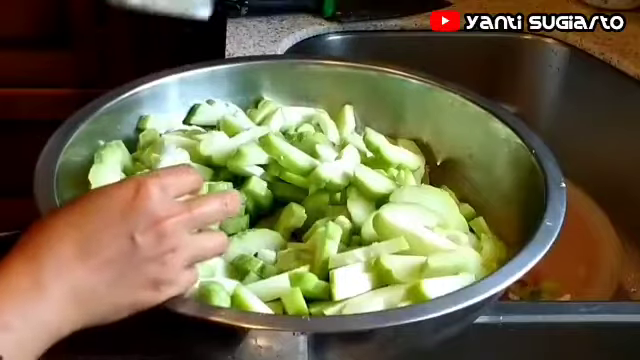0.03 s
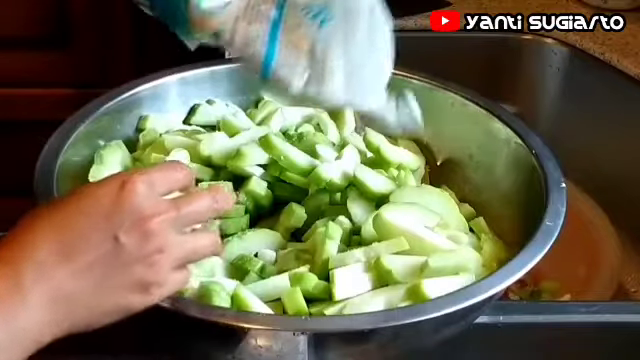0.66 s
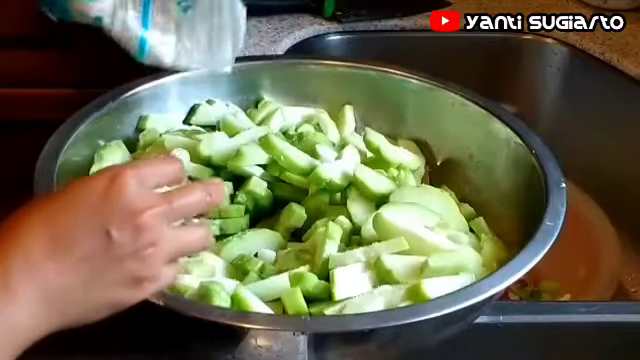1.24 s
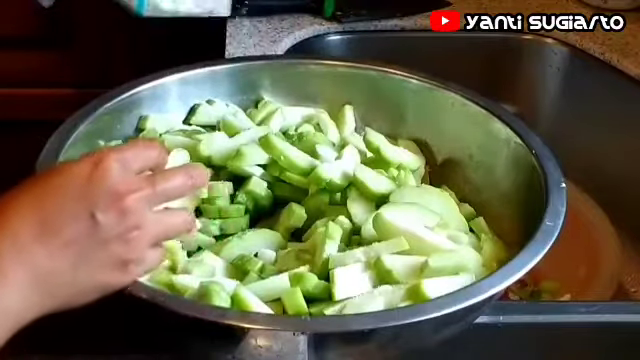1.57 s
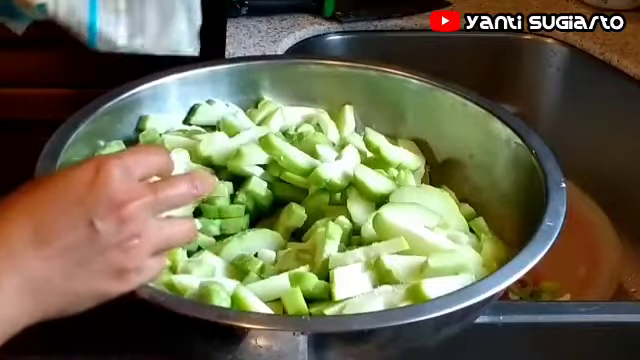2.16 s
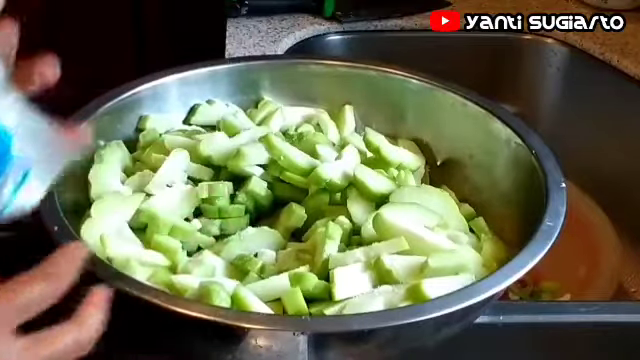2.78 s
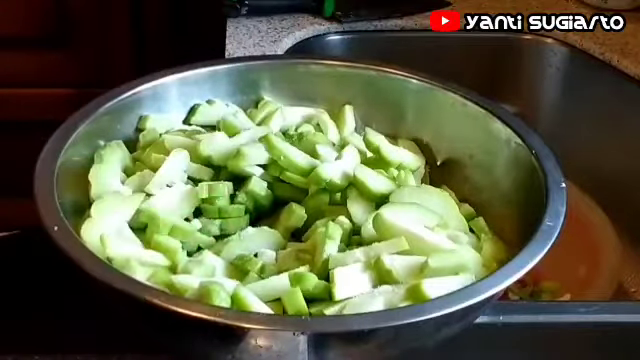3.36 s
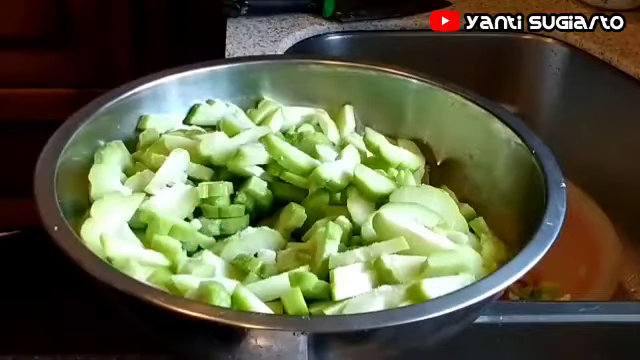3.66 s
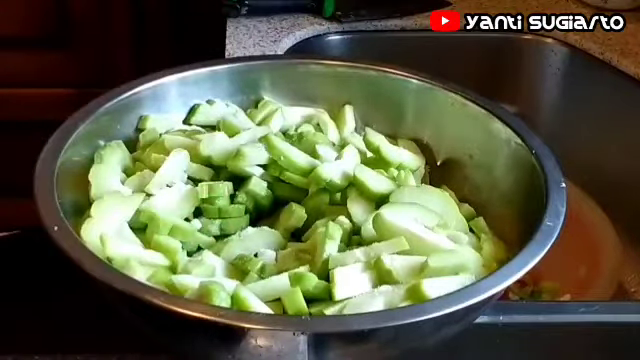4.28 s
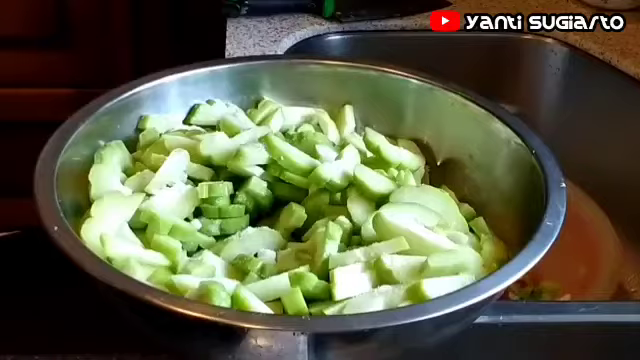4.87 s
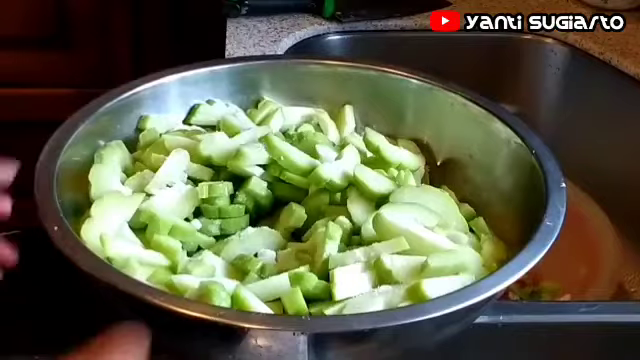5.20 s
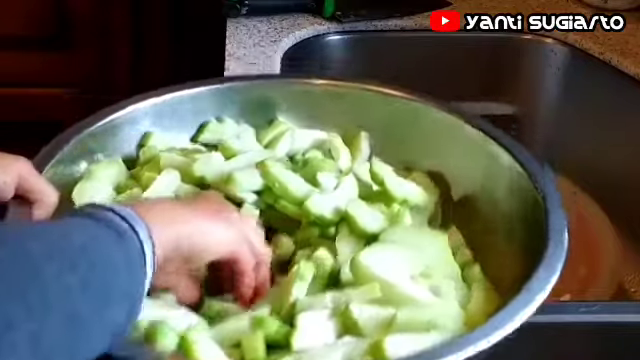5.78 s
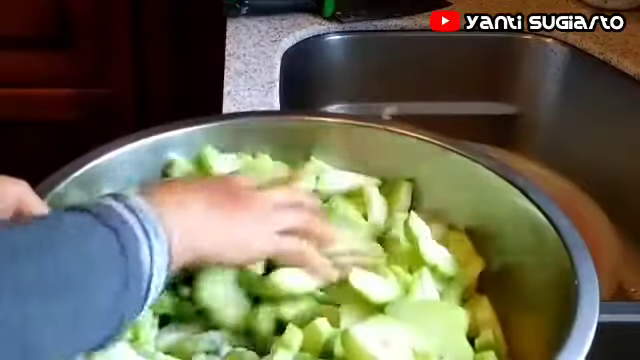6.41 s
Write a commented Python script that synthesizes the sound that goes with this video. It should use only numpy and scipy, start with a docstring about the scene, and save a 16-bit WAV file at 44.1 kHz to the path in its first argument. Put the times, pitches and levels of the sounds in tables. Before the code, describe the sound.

A plastic bag crinkles and snaps over a kitchen appliance hum, then wet vegetable slices squelch as a steel bowl scrapes.

```python
"""At a kitchen sink, in a small hard room that answers every snap while an appliance hums throughout.
A plastic bag of seasoning is shaken over sliced vegetables in a steel bowl: its creases tick and crumple,
its film and the grains inside hiss. It is folded and put down, buckling with sharp snaps and knocking
on the counter. A hand digs into the wet slices, which squelch, plop and whistle as it starts to toss
them, and the bowl scrapes along the sink edge."""
import sys
import numpy as np
from scipy import signal
from scipy.fft import rfft, irfft, next_fast_len
from scipy.io import wavfile
from scipy.ndimage import uniform_filter1d, minimum_filter1d, map_coordinates

SR = 44100
rng = np.random.default_rng(int(sys.argv[2]) if len(sys.argv) > 2 else 0)


def int16_out(signal):
    """Quantize to a 16-bit WAV file."""
    q = np.round(np.clip(np.atleast_2d(signal).T, -1, 1) * 32767)
    wavfile.write(sys.argv[1], SR, q.astype(np.int16))


N = 288399
TIME_S = np.arange(N) / SR


def amp(db):
    """Decibels to gain."""
    return 10 ** (np.asarray(db) / 20)


def unit(x):
    """Scale to rms 1."""
    return x / np.sqrt(np.mean(x ** 2) + 1e-20)


def along(points, hz):
    """Read a curve of (freq_hz, value) points on a log frequency axis."""
    freqs, values = np.transpose(points)
    return np.interp(np.log(hz + 1), np.log(freqs), values)


def wobble(rate_hz):
    """Smooth random modulation, with rate_hz new values a second."""
    knots = rng.standard_normal(int(N * rate_hz / SR) + 4)
    return map_coordinates(knots, [TIME_S * rate_hz])


def filtered(x, response):
    """Apply a complex frequency response."""
    size = next_fast_len(len(x) + SR // 8)
    return irfft(rfft(x, size) * response(np.fft.rfftfreq(size, 1 / SR)), size)[:len(x)]


def coloured(x, spectrum, size=1024):
    """Minimum-phase EQ through (freq_hz, gain_db) points, so attacks stay sharp."""
    cepstrum = irfft(np.log(amp(along(spectrum, np.fft.rfftfreq(size, 1 / SR)))))
    cepstrum[1:size // 2] *= 2
    cepstrum[size // 2 + 1:] = 0
    return signal.fftconvolve(x, irfft(np.exp(rfft(cepstrum))))[:len(x)]


def resonant(x, modes):
    """Parallel resonators (pitch_hz, width_hz, gain_db) of alternating polarity."""
    def response(f):
        return sum((-1) ** k * amp(db) * 1j * f * width / (hz * hz - f * f + 1j * f * width)
                   for k, (hz, width, db) in enumerate(modes))
    return filtered(x, response)


def bell(x, hz, width):
    """One resonance applied twice for steep skirts; width is a share of its pitch."""
    mode = [(hz, width * hz, 0)]
    return resonant(resonant(x, mode), mode)


def add(track, start_s, sound):
    """Mix a sound in at its cue."""
    start = max(round(start_s * SR), 0)
    track[start:start + len(sound)] += sound[:max(N - start, 0)]


def grains(per_s, spread_db):
    """Random tiny impulses of uneven size, rms 1."""
    sizes = amp(spread_db * np.minimum(rng.standard_normal(N), 2)) * rng.choice([-1, 1], N)
    return unit(sizes * (rng.random(N) < per_s / SR))


def burst(t60_s, direct):
    """One impulse and its dense scatter off the near surfaces."""
    t = np.arange(SR // 10) / SR
    scatter = rng.standard_normal(len(t)) * amp(-60 * t / t60_s)
    return scatter / np.linalg.norm(scatter) + direct * (t == 0)


def swell(peak_s, length_s, level_db, rise, roundness):
    """One move's envelope, 10 dB down at each end. Rise: attack share; roundness: 1 pointed, 2 round."""
    t = TIME_S - peak_s
    away = np.maximum(-t / rise, t / (1 - rise)) / length_s
    return amp(level_db - 10 * np.minimum(away, 10) ** roundness)


def together(levels):
    """Overlapping movements add in power."""
    return np.sqrt(sum(level ** 2 for level in levels))


# fader ride of the appliance: time_s, level_db
APPLIANCE_RIDE = [(0, -36), (.7, -39.5), (2.1, -39), (2.7, -37), (3.75, -34.5), (4.35, -37), (4.8, -42.5),
                  (5.5, -42), (6.0, -39.5), (6.54, -37.5)]
# mains and motor tones: pitch_hz, relative_db
HUM_TONES = [(59.2, -43), (102.3, -50.5), (118.4, -46.5), (172.3, -68), (258.4, -60.5), (468.3, -68),
             (581.4, -67)]
# resonances of the casing: pitch_hz, width_hz, relative_db
PANEL_MODES = [(48.3, 8.3, -5.5), (82.5, 33, -4), (171, 25, -13), (265.5, 53, -8.5)]
# rush of air: freq_hz, gain_db
AIR_EQ = [(150, -30.5), (330, -11.5), (470, -9.5), (680, -11.5), (900, -9.5), (1400, -14), (2500, -17.5),
          (4000, -26), (6000, -30.5), (15000, -32)]
def appliance():
    """The bed: wavering mains and motor tones, rumbling panels and a rush of air."""
    times, levels_db = np.transpose(APPLIANCE_RIDE)
    level = amp(np.interp(TIME_S, times, levels_db))
    tones = np.zeros(N)
    for hz, db in HUM_TONES:
        gain = amp(db + 0.61 * wobble(4.9))
        tones += gain * np.sin(2 * np.pi * (hz * TIME_S + rng.random()) + .1 * wobble(3.9))
    panels = sum(amp(db) * unit(bell(rng.standard_normal(N), hz, width_hz / hz))
                 for hz, width_hz, db in PANEL_MODES)
    rumble_eq = [(25, 0.5), (130, -2), (300, -9.5), (500, -34), (2000, -86)]  # freq_hz, gain_db
    rumble = unit(coloured(rng.standard_normal(N), rumble_eq))
    air = unit(coloured(rng.standard_normal(N), AIR_EQ))
    mix = amp(-0.73) * unit(tones) + amp(-8.5) * unit(panels) + amp(-12) * rumble + amp(-16) * air
    return level * mix


# small creases flipping: start_s, relative_db, centre_hz
CREASE_TICKS = [(.019, -44, 4500), (.691, -48, 5000), (0.776, -44, 3500), (0.972, -39, 7050),
                (.986, -40.5, 4000), (1.211, -51, 8000), (1.431, -44, 2300), (1.527, -35, 11800),
                (1.531, -37.5, 3280), (1.805, -46.5, 6000), (2.179, -32, 8160), (2.207, -50, 6000),
                (2.2486, -41.5, 2370), (2.572, -44.5, 1990), (4.066, -43.5, 12000), (4.319, -45, 10000),
                (4.402, -43.5, 11100)]
def bag_ticks():
    """Single creases in the film flip with a thin tick."""
    out = np.zeros(N)
    for start_s, db, hz in CREASE_TICKS:
        tick = resonant(burst(t60_s=.04, direct=.3), [(hz, 0.73 * hz, 0)])
        add(out, start_s, amp(db - 17.5) * unit(tick))
    return out


def bowl_ping(start_s=.022, pitch_hz=2125, level_db=-38.5, t60_s=0.15):
    """One light touch lets the steel bowl ping."""
    out, t = np.zeros(N), np.arange(SR // 3) / SR
    add(out, start_s, amp(level_db - 60 * t / t60_s) * np.sin(2 * np.pi * pitch_hz * t))
    return out


# shaking the bag over the bowl: peak_s, length_s, hiss_db
BAG_SHAKES = [(0.038, 0.046, -37), (0.077, 0.043, -41.5), (0.163, 0.12, -56), (0.729, 0.051, -46.5),
              (0.773, 0.052, -42.5), (0.904, 0.11, -45), (0.992, 0.17, -50), (1.5, 0.11, -49),
              (1.658, 0.039, -48), (1.823, 0.052, -55), (2.18, 0.073, -41.5), (2.291, 0.081, -34.5),
              (2.396, 0.089, -45)]
# folding and pressing it: peak_s, length_s, hiss_db, crumple_over_hiss_db
BAG_FOLDS = [(2.63, 0.29, -54, 4), (2.797, .14, -40, -3), (2.874, 0.1, -32, -2.5), (3.051, 0.2, -46, 1),
             (3.175, 0.12, -38.5, -1.5), (3.281, 0.11, -38.5, -4), (3.473, 0.098, -37, 6.5),
             (3.559, .15, -32, -2.5), (3.794, 0.33, -42.5, 8), (3.98, 0.12, -40.5, -1),
             (4.121, 0.038, -27, 4.5), (4.188, 0.09, -40.5, 8.5), (4.338, 0.1, -56, 15.5)]
# midrange body of the creased bag: freq_hz, gain_db
CRUMPLE_EQ = [(200, -24), (450, -8.5), (950, -2.5), (1350, -3), (2000, -2), (2350, -0.5), (2750, -2.5),
              (3250, -4.5), (4300, -8.5), (5500, -15), (9000, -39)]
# bright top of the thin film: freq_hz, gain_db
FILM_EQ = [(1500, -26), (3400, 1), (4800, 0), (7000, 0), (11000, -3.5), (15000, -1)]
def bag_rustle(shake_crumple_db=-3.5):
    """Each move stirs clumps of creases: broad folds crumple, the film and the grains in it hiss."""
    # a loosely held bag hisses more than it crumples
    moves = [(*shake, shake_crumple_db) for shake in BAG_SHAKES] + BAG_FOLDS
    hiss_levels, crumple_levels = [], []
    for peak_s, length_s, hiss_db, crumple_db in moves:
        effort = swell(peak_s, length_s, hiss_db, rise=0.46, roundness=0.98)
        hiss_levels.append(effort)
        crumple_levels.append(effort * amp(crumple_db))
    clumps = amp(1.8 * wobble(70))
    crumple = unit(coloured(grains(per_s=1100, spread_db=4) * clumps, CRUMPLE_EQ))
    hiss = unit(coloured(grains(per_s=2200, spread_db=4) * clumps, FILM_EQ))
    return amp(-2.5) * together(crumple_levels) * crumple + amp(-2) * together(hiss_levels) * hiss


# dull knock inside a snap: freq_hz, gain_db
KNOCK_EQ = [(150, -27), (400, -15.5), (580, -5), (800, 1), (1250, 5), (1800, -2.5), (2600, -35),
            (5000, -63.5)]
def buckle(ring_hz, crack_db, knock_db=-4.5):
    """A fold gives way: a dull knock, a quickly damped ring and a bright crack."""
    knock = unit(coloured(burst(t60_s=0.039, direct=0.4), KNOCK_EQ))
    fold = coloured(burst(t60_s=0.025, direct=0.57), CRUMPLE_EQ)
    ring = unit(bell(fold, ring_hz, width=0.42))
    crack = unit(coloured(burst(t60_s=0.04, direct=0.51), FILM_EQ))
    return amp(knock_db) * knock + ring + amp(crack_db) * crack


# the bag buckling and landing: start_s, ring_hz, ring_relative_db, crack_over_ring_db, thud_relative_db
BAG_SNAPS = [(2.677, 1500, -39, -29, -62), (2.7063, 2420, -31, -8, -68), (2.869, 2570, -23.5, -17.5, -63),
             (2.876, 1560, -23.5, -6, -58), (3.151, 1190, -41.5, -10, -49),
             (3.3289, 2290, -15.5, -7, -35.5), (3.441, 2000, -30, -21.5, -54.5),
             (3.4753, 760, -18.5, -19, -39.5), (3.4767, 2640, -26.5, -11.5, -57),
             (3.5512, 940, -33, -10, -35.5), (3.7047, 795, -32, -12, -33.5),
             (3.7192, 2100, -29.5, -17.5, -51), (3.7274, 2090, -26.5, -21.5, -35.5),
             (3.7394, 2460, -32, -20, -48.5), (3.7752, 2350, -21.5, -8, -35.5),
             (3.807, 1770, -30, -12, -34), (3.828, 1800, -29.5, -21, -44), (3.86, 1300, -25, -11, -45),
             (3.8652, 2850, -14.5, -3.5, -49), (3.8723, 1800, -6.5, -5, -31),
             (3.875, 2820, -14.5, 3.5, -60.5), (3.895, 1910, -22.5, -17, -56),
             (4.041, 900, -40, -11.5, -44), (4.0894, 1780, -28.5, -1, -50), (4.096, 2470, -23.5, -12, -52),
             (4.0999, 2290, -18, -5, -36.5), (4.124, 1100, -31.5, -7, -52), (4.1935, 2480, -26, -2, -57),
             (4.338, 2620, -29, -14.5, -35.5), (4.428, 1320, -32.5, -33, -62)]
# resonances of the hollow counter: pitch_hz, width_hz, gain_db
COUNTER_MODES = [(210, 140, -10), (397, 58, 1), (430, 62, 2.5), (516, 33, 0)]
def bag_snaps(rebound_s=.0028, rebound_db=-3.5):
    """Each snap is a buckle and its weaker rebound; the bag's weight rings the hollow counter."""
    snaps, blows = np.zeros(N), np.zeros(N)
    for start_s, ring_hz, ring_db, crack_db, thud_db in BAG_SNAPS:
        add(snaps, start_s, amp(ring_db) * buckle(ring_hz, crack_db))
        add(snaps, start_s + rebound_s, amp(ring_db + rebound_db) * buckle(ring_hz, crack_db))
        blows[round(start_s * SR)] = amp(thud_db)
    return amp(-11.5) * snaps + amp(51.5) * resonant(blows, COUNTER_MODES)


# soft sub-bass bumps: start_s, relative_db, pitch_hz
COUNTER_BUMPS = [(4.10, -36, 33.8), (5.66, -33, 37), (6.465, -24, 36.6)]
def counter_bumps():
    """The counter gives a couple of slow swings when weight lands on it."""
    out, t = np.zeros(N), np.arange(SR // 3) / SR
    envelope = (t / 0.032) ** 2 * np.exp(2 - 2 * t / 0.026)
    for start_s, db, hz in COUNTER_BUMPS:
        add(out, start_s, amp(db) * envelope * np.sin(2 * np.pi * hz * t))
    return out


HAND_RISE, HAND_ROUND = 0.51, 1.4  # envelope shape of an arm or hand move
# soft, dull body of both the sleeve and the wet slices: freq_hz, gain_db
SOFT_EQ = [(100, -11), (230, 10.5), (380, -1.5), (650, -3), (930, 1.5), (1600, -6), (3000, -5),
           (5500, -18.5), (10000, -35)]
def sleeve():
    """A dull brush of cloth as the arm comes in."""
    brush = swell(peak_s=5.09, length_s=0.24, level_db=-58, rise=HAND_RISE, roundness=HAND_ROUND)
    return brush * unit(coloured(rng.standard_normal(N), SOFT_EQ))


# the hand pushing through the slices: peak_s, length_s, level_db
HAND_STROKES = [(5.522, .07, -57), (5.643, 0.05, -52), (5.773, 0.093, -51.5), (5.885, 0.28, -48),
                (6.021, .08, -42), (6.125, 0.16, -45.5), (6.263, .14, -59.5), (6.449, 0.11, -47.5),
                (6.511, 0.07, -40)]
# wet sizzle of droplets: freq_hz, gain_db
FIZZ_EQ = [(1500, -22), (3500, -4.5), (5000, -3), (7000, -1), (11000, -3.5), (15000, -2.5)]
# slices dropping and sticking to each other: start_s, relative_db, pitch_hz
SLICE_PLOPS = [(5.511, -56, 4800), (5.556, -56, 4500), (5.775, -47, 2010), (5.832, -38, 1210),
               (6.018, -43, 3500), (6.409, -32, 633), (6.481, -44, 3000), (6.516, -33.5, 960)]
def wet_slices():
    """Wet slices squelch and fizz with each stroke of the hand; some drop with a plop."""
    effort = together(swell(*stroke, HAND_RISE, HAND_ROUND) for stroke in HAND_STROKES)
    squelch = unit(coloured(grains(per_s=2500, spread_db=3), SOFT_EQ))
    fizz = unit(coloured(grains(per_s=6000, spread_db=3), FIZZ_EQ))
    out = effort * (amp(0.4) * squelch + amp(-4.3) * fizz)
    for start_s, db, hz in SLICE_PLOPS:
        plop = bell(burst(t60_s=0.051, direct=0.48), hz, width=0.38)
        add(out, start_s, amp(db - 13.5) * unit(plop))
    return out


# resonances of the steel bowl at the peak of the drag: pitch_hz, width_hz, gain_db
BOWL_MODES = [(1120, 60, -20), (1740, 60, -5), (2450, 300, -6.5), (3620, 97, 0.5), (3840, 110, 0),
              (3930, 87, -0.5), (4370, 290, -6.5), (6440, 150, -12)]
def bowl_drag(peak_s=6.0, sag_per_s=.1):
    """Uneven slips on the sink edge excite the steel, whose pitch sags as the hand loads the bowl."""
    slips = grains(per_s=900, spread_db=4) * amp(2.5 * wobble(45))
    speed = 1 - sag_per_s * np.clip(TIME_S - peak_s, -.5, .5)  # varispeed bends all modes together
    scrape = map_coordinates(resonant(slips, BOWL_MODES), [np.cumsum(speed)], mode="wrap")
    return swell(peak_s, length_s=0.43, level_db=-47, rise=0.51, roundness=2) * unit(scrape)


# air squeezed from between wet slices: start_s, length_s, start_pitch_hz, relative_db
GAP_WHISTLES = [(6.23, .07, 12150, -64), (6.245, .055, 10300, -65), (6.282, 0.14, 14100, -62)]
def wet_whistles():
    """Thin whistles that rise as the wet gap closes."""
    out = np.zeros(N)
    for start_s, length_s, hz, db in GAP_WHISTLES:
        progress = np.linspace(0, 1, round(length_s * SR))
        pitch_hz = hz * (1 + .028 * progress * (2 - progress))
        envelope = amp(db + 2) * np.sin(np.pi * progress)
        add(out, start_s, envelope * np.sin(2 * np.pi * np.cumsum(pitch_hz) / SR))
    return out


def early_reflections(x, level_db, count=8):
    """Weak, quick echoes off the sink, counter and tiles."""
    delays_s, signs = rng.uniform(0.0018, 0.023, count), rng.choice([-1, 1], count)
    echoes = (sign * np.pad(x, (round(delay_s * SR), 0))[:N] for delay_s, sign in zip(delays_s, signs))
    return amp(level_db) * sum(echoes)


# decay time of the room: freq_hz, t60_s
KITCHEN_DECAY = [(200, .33), (1000, 0.59), (2500, 0.4), (8000, 0.51), (15000, 0.33)]
def kitchen_reverb(x, predelay_s=0.006):
    """A diffuse tail in which each frequency dies at its own speed."""
    hz, t, noise = signal.stft(rng.standard_normal(SR // 2), SR, nperseg=256)
    decay = amp(-60 * t / along(KITCHEN_DECAY, hz)[:, None])
    tail = signal.istft(noise * decay, SR, nperseg=256)[1]
    delayed = np.pad(x, (round(predelay_s * SR), 0))
    return signal.fftconvolve(delayed, tail / np.linalg.norm(tail))[:N]


def scene():
    """The mono mix: hits and handling feed the room; whistles, bumps and the appliance stay dry."""
    hits = bag_snaps() + bag_ticks()
    handling = bag_rustle() + sleeve() + wet_slices() + bowl_ping() + bowl_drag()
    close = hits + handling
    early = early_reflections(close, level_db=-19.5)
    tail = kitchen_reverb(amp(-11.5) * hits + amp(-9) * handling)
    return (close + early + tail + wet_whistles() + counter_bumps() + appliance())[None]


def limiter(x, ceiling_db, release_db_per_s, smooth_samples=33):
    """Gain drops at once on a peak above the ceiling and creeps back."""
    over_db = np.maximum(20 * np.log10(np.abs(x) + 1e-9) - ceiling_db, 0)
    release_db = release_db_per_s * TIME_S
    cut_db = np.maximum.accumulate(over_db + release_db) - release_db
    return x * amp(uniform_filter1d(minimum_filter1d(-cut_db, smooth_samples), smooth_samples))


TOP_HZ = 15650
# treble lift of the microphone port: freq_hz, gain_db
MIC_EQ = [(6800, 0), (8100, 6.5), (9400, 1.5), (12000, 3.5), (15000, 8), (15650, 8.5)]
def record(dry):
    """The phone brightens the treble, limits the tallest peaks and keeps nothing above its band limit."""
    bright = filtered(coloured(dry[0], MIC_EQ), lambda hz: hz < TOP_HZ)
    limited = limiter(bright, ceiling_db=-.1, release_db_per_s=42)
    return filtered(limited, lambda hz: hz < TOP_HZ)[None]


dry = scene()
out = record(dry)
int16_out(out)
```